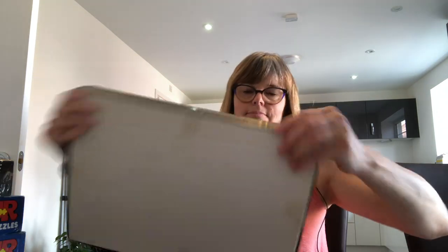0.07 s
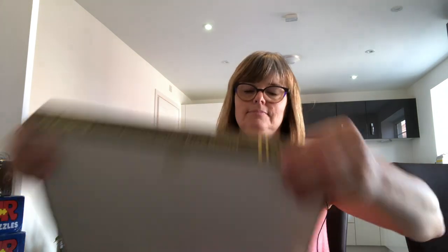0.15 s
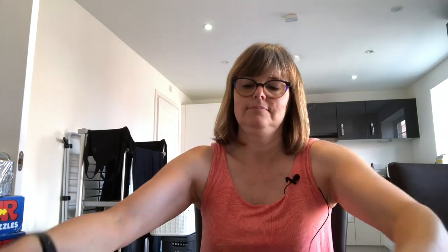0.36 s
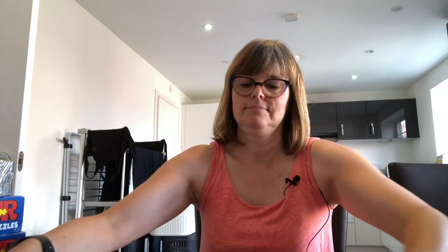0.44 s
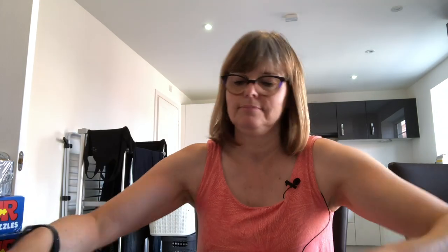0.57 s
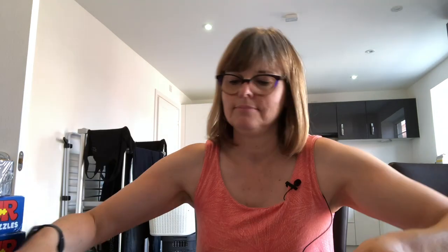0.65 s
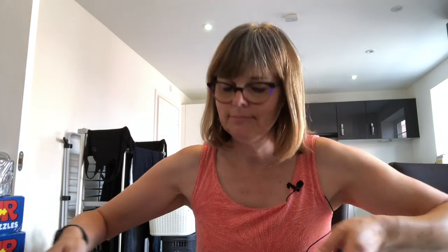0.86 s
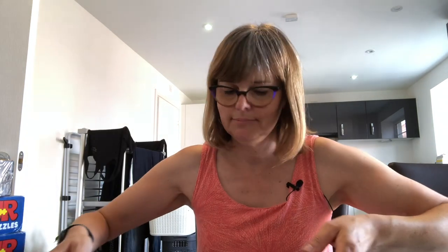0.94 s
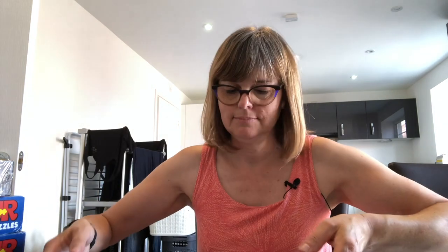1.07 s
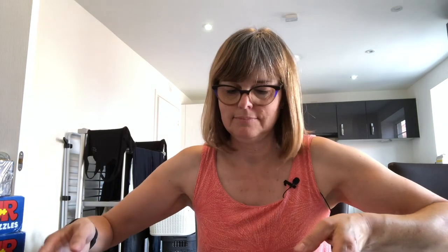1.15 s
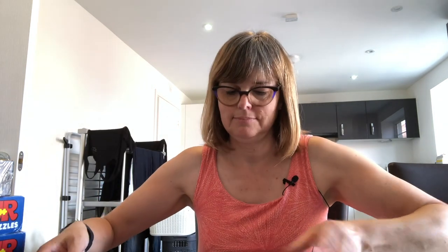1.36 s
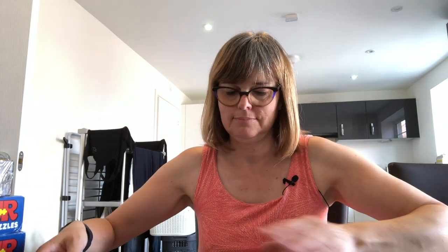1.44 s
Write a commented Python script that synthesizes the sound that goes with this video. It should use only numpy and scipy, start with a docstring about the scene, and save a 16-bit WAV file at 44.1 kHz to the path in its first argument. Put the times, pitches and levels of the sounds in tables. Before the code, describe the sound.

A cardboard puzzle box slaps onto a table at about 0.2 seconds, a loud hollow thump with rattling pieces that briefly overloads the close microphone and rings in a quiet kitchen. Skin brushes the card as the box rocks, then it drops flat with a smaller knock near 0.55 seconds. Around 0.9 and 1.2 seconds, hands softly bump the table, with faint sliding and fingernail ticks.

```python
"""In a quiet, hard-walled kitchen, skin brushes over card. At 0.22 s a cardboard puzzle box is slapped
onto a table: the hollow box rings, the table thumps, the pieces rattle, the card snaps, and a small
clip-on microphone overloads. The box rocks as the room rings on, then drops flat at about 0.56 s.
From 0.9 s hands bump the table and slide off the card, with small ticks of fingernails."""
import sys
import numpy as np
from scipy import signal
from scipy.fft import rfft, irfft
from scipy.io import wavfile
from scipy.ndimage import uniform_filter1d

SR = 44100
rng = np.random.default_rng(int(sys.argv[2]) if len(sys.argv) > 2 else 0)


def output_pcm(signal):
    """Save a mono or channel-first signal as 16-bit PCM at the path in sys.argv[1].

    Samples are clipped to [-1, 1] before scaling.
    """
    pcm = np.clip(np.atleast_2d(signal).T, -1, 1) * 32767
    wavfile.write(sys.argv[1], SR, np.round(pcm).astype(np.int16))


N = 66150
T = np.arange(N) / SR
FREQS = np.fft.rfftfreq(2 * N, 1 / SR)


def undb(db):
    return 10 ** (np.asarray(db) / 20)


def unit_rms(x):
    return x / np.sqrt(np.mean(x ** 2))


def decay(t60):
    """An envelope that falls 60 dB in t60 seconds."""
    return np.exp(-np.log(1000) * T / t60)


def delayed(x, seconds):
    return np.concatenate([np.zeros(int(seconds * SR)), x])[:N]


def equalise(x, gain):
    """Filter by a gain at every frequency."""
    return irfft(rfft(x, 2 * N) * gain)[:N]


def colour(x, eq):
    """Shape a steady signal with an EQ curve (f/Hz, level/dB), then set it to rms 1."""
    hz, db = np.array(eq).T
    gain = undb(np.interp(np.log(FREQS + 1), np.log(hz), db))
    return unit_rms(equalise(x, gain))


def noise(eq):
    return colour(rng.standard_normal(N), eq)


def strike(modes, cutoff_hz, pitch):
    """Damped modes pushed inwards together; a softer contact has a lower cutoff and sounds duller."""
    ring = -sum(undb(db) * decay(t60) * np.cos(2 * np.pi * hz * pitch * T) for hz, db, t60 in modes)
    return signal.sosfilt(signal.butter(4, cutoff_hz, fs=SR, output="sos"), ring)


# EQ of the room's air, mostly rumble: f/Hz, level/dB
AIR_EQ = [(20, 4), (45, -14), (90, -20.5), (140, -18), (200, -23.5), (330, -29), (600, -25), (1100, -32),
          (3000, -42.5), (15000, -55.5)]
def room_tone():
    """A bed of quiet air with a faint, wavering hum."""
    hum_hz, half_width_hz = 411.6, 16.55
    hum = equalise(rng.standard_normal(N), 1 / (1 + ((FREQS - hum_hz) / half_width_hz) ** 2))
    return undb(-49) * noise(AIR_EQ) + undb(-66.5) * unit_rms(hum)


# EQ of the rub, the warm body of a stroke: f/Hz, level/dB
RUB_EQ = [(100, -11), (400, 2), (700, 1), (1300, -8.5), (2500, -19.5), (6000, -33), (16000, -48)]
# EQ of the hiss on top: f/Hz, level/dB
HISS_EQ = [(500, -50), (2500, 6.5), (6500, 2.5), (9000, 0), (13000, 0.5), (16000, -0.5)]
# strokes on the card: centre t/s, half length/s, rub level/dB, hiss level/dB
STROKES = [(0.004, 0.05, -50.5, -64.5), (0.121, 0.14, -58, -68), (0.325, 0.055, -41.5, -71),
           (0.433, 0.062, -48, -57.5), (0.517, 0.022, -50, -61.5), (0.558, 0.007, -29.5, -69),
           (1.1, 0.022, -54, -66.5), (1.139, 0.042, -60, -67), (1.223, 0.017, -49, -69),
           (1.291, 0.06, -57, -66.5), (1.339, 0.013, -61.5, -60.5)]
def skin_slides():
    """Skin sliding over card swells and fades, catching unevenly."""
    grain_s, roughness_db = 0.0038, 1.5
    out = 0
    for centre, half_s, rub_db, hiss_db in STROKES:
        catch = unit_rms(uniform_filter1d(rng.standard_normal(N), int(grain_s * SR)))
        swell = np.exp(-((T - centre) / half_s) ** 2)
        friction = undb(rub_db) * noise(RUB_EQ) + undb(hiss_db) * noise(HISS_EQ)
        out += swell * undb(roughness_db * catch) * friction
    return out


# hollow ring of the box: f/Hz before each blow's pitch factor, level/dB, t60/s
BOX_MODES = [(241.5, -11.5, 0.04), (367, -9.5, 0.028), (430, 0.5, 0.04), (557.6, -7, 0.055),
             (647.3, -5.5, 0.049), (800, -21.5, 0.075), (1096, -12.5, 0.019), (1520, -23, 0.025),
             (2264, -11.5, 0.0071)]
# EQ of the rattling pieces: f/Hz, level/dB
RATTLE_EQ = [(200, -28.5), (600, -3), (1200, 7.5), (1800, 0.5), (2400, -2), (3200, -6.5), (5100, -8),
             (6000, -18.5), (9000, -28), (16000, -39.5)]
# slap, rocking and drop: t/s, ring level/dB, contact cutoff f/Hz, pitch factor, rattle level/dB
BOX_BLOWS = [(0.2184, -4.5, 1150, 0.95, -24), (0.2226, -4.5, 1294, 0.94, -19.5),
             (0.2403, -24, 1500, 0.78, -28), (.3625, -27, 1160, 1.6, -35.5), (.411, -37, 1310, 0.8, -68),
             (.528, -39.5, 805, 1.55, -70), (0.5404, -27, 640, 1.08, -58), (0.5572, -38, 880, 1.46, -33),
             (0.5572, -13.5, 441, 0.934, -40), (0.5603, -15, 570, 0.91, -29),
             (.567, -19, 1430, 1.291, -29.5), (.588, -23, 680, 1.07, -42), (0.606, -27, 494, 0.947, -50)]
def box_blows():
    """Each blow rings the box and shakes clicks from the pieces; the card radiates little bass."""
    clicks_per_s, rise_s, low_cut_hz = 4500, 0.00043, 158
    shake = decay(t60=0.052) * (1 - np.exp(-T / rise_s))
    out = 0
    for start, ring_db, cutoff_hz, pitch, rattle_db in BOX_BLOWS:
        clicks = rng.standard_normal(N) * (rng.random(N) < clicks_per_s / SR)
        rattle = undb(rattle_db) * colour(clicks, RATTLE_EQ) * shake
        ring = undb(ring_db) * strike(BOX_MODES, cutoff_hz, pitch)
        out += delayed(ring + rattle, start)
    return signal.sosfilt(signal.butter(2, low_cut_hz, "high", fs=SR, output="sos"), out)


# EQ of the table's dull shudder: f/Hz, level/dB
SHUDDER_EQ = [(20, -5), (45, 4.5), (95, -1), (135, -0.5), (210, -9), (400, -23.5), (2000, -66.5)]
# low-end weight under the hits: t/s, shudder level/dB, boom level/dB
TABLE_THUMPS = [(0.2189, -26.5, -15.5), (0.355, -41, -36), (0.438, -40, -35.5), (0.541, -31.5, -27),
                (0.56, -30.5, -28), (0.907, -51, -62), (1.206, -46, -53)]
def table_thumps():
    """The table shudders under the weight and its lowest mode booms briefly."""
    boom_hz = 134
    boom = np.sin(2 * np.pi * boom_hz * T) * decay(t60=0.086)
    attack = 1 - decay(t60=0.013)
    out = 0
    for start, shudder_db, boom_db in TABLE_THUMPS:
        shudder = undb(shudder_db) * noise(SHUDDER_EQ) * decay(t60=0.13)
        out += delayed((undb(boom_db) * boom + shudder) * attack, start)
    return out


# EQ of a crisp snap: f/Hz, level/dB
SNAP_EQ = [(800, 4), (2900, -9.5), (4800, -5), (6000, -7), (9500, -7), (16000, -32)]
# snap cues: t/s, level/dB
SNAPS = [(0.2205, -34), (0.2408, -40.5), (0.84, -55.5), (.907, -49.5), (0.91, -52), (0.926, -58),
         (1.297, -50.5)]
def card_snaps():
    """Card and fingernails tick in tiny, bright bursts of noise."""
    return sum(delayed(undb(db) * noise(SNAP_EQ) * decay(t60=0.021), start) for start, db in SNAPS)


# bands of the diffuse tail: f/Hz, level/dB, t60/s
REVERB_BANDS = [(61.4, -8.5, 0.93), (157, -14, 0.63), (248, -7.5, 0.4), (440, -12.5, 0.44), (860, -8, 0.34),
                (1480, -8.5, 0.56), (3000, -9, 0.5), (5200, -12.5, 0.64), (8900, -6.5, 0.25),
                (16000, -22.5, 0.22)]
# standing waves between the walls: f/Hz, level/dB, t60/s
STANDING_WAVES = [(250, -0.5, 0.6), (362, -2.5, 0.3), (397, -9, 0.37), (433.7, -5, 0.47), (584, -9, .3),
                  (673.4, -2, 0.44), (682, -5.5, 0.44), (821, 5, 0.15), (921, -11.5, 0.46)]
def kitchen_reverb(x):
    """Hard walls return a diffuse tail that dies band by band, and a few ringing standing waves."""
    predelay_s, build_s = 0.0076, 0.0029
    scatter, tail = rng.standard_normal(N), 0
    log_centres = np.log([hz for hz, _, _ in REVERB_BANDS])
    for solo, (_, db, t60) in zip(np.eye(len(REVERB_BANDS)), REVERB_BANDS):
        band = equalise(scatter, np.interp(np.log(FREQS + 1), log_centres, solo))
        envelope = decay(t60) * (1 - np.exp(-T / build_s))
        tail += undb(db) * band * envelope / np.linalg.norm(envelope)
    for hz, db, t60 in STANDING_WAVES:
        tail += undb(db) * 2 * np.cos(2 * np.pi * hz * T) * decay(t60) / decay(t60).sum()
    return signal.fftconvolve(x, delayed(tail, predelay_s))[:N]


# knock of the table top: f/Hz before the pitch factor, level/dB, t60/s
TABLE_MODES = [(183.6, -17, 0.15), (297.4, -9.5, 0.069), (391, -4.5, 0.04), (594, -11, 0.021),
               (937, -4.5, 0.012), (1570, -6.5, 0.023)]
# hands landing: t/s, level/dB, contact cutoff f/Hz
HAND_BUMPS = [(0.907, -43.5, 880), (0.9139, -39, 1200), (.923, -33.5, 905), (.976, -44.5, 700),
              (1.178, -48, 1046), (1.21, -46.5, 620), (1.2156, -37.5, 940), (1.2225, -35.5, 1340),
              (1.229, -43, 1150), (1.295, -45.5, 1170)]
def hand_bumps():
    """Soft hands knock a muffled ring out of the table top."""
    return sum(delayed(undb(db) * strike(TABLE_MODES, cutoff_hz, pitch=0.907), start)
               for start, db, cutoff_hz in HAND_BUMPS)


def scene():
    """Mono mix: the knocks feed the reverb; slides and snaps stay close and dry."""
    knocks = box_blows() + table_thumps() + hand_bumps()
    return (knocks + kitchen_reverb(knocks) + card_snaps() + skin_slides() + room_tone())[None]


def record(dry):
    """The microphone drops the deepest bass; the recorder clips at full scale and cuts the top."""
    low_cut_hz, drive_db, high_cut_hz = 22.1, 2.5, 15700
    heard = signal.sosfilt(signal.butter(1, low_cut_hz, "high", fs=SR, output="sos"), dry)
    clipped = np.clip(undb(drive_db) * heard, -1, 1)
    return signal.sosfilt(signal.ellip(10, .1, 70, high_cut_hz, fs=SR, output="sos"), clipped)


dry = scene()
out = record(dry)
output_pcm(out)
```